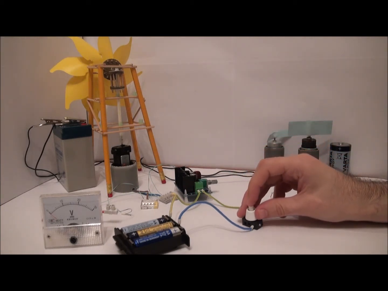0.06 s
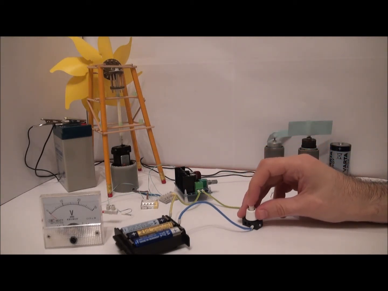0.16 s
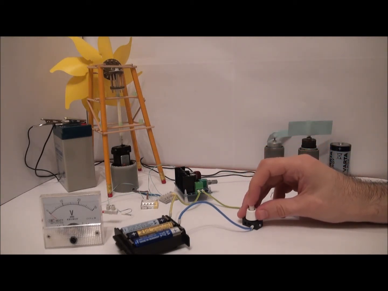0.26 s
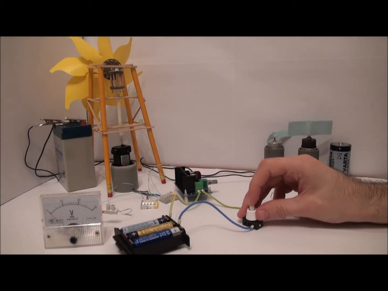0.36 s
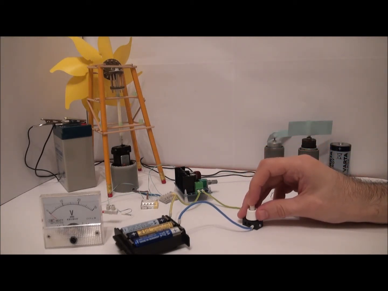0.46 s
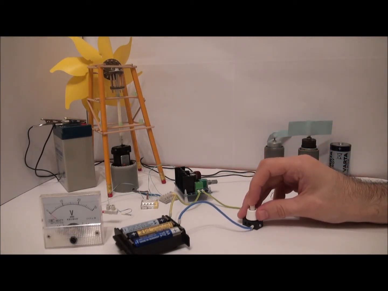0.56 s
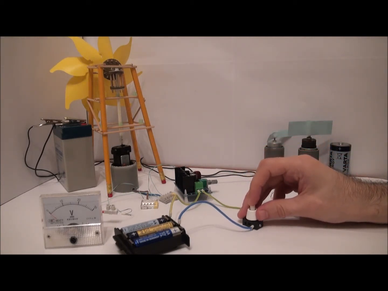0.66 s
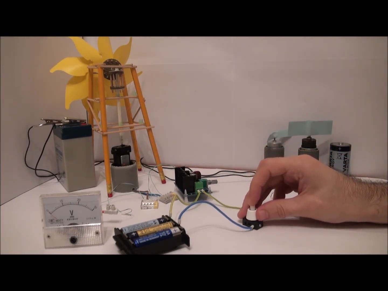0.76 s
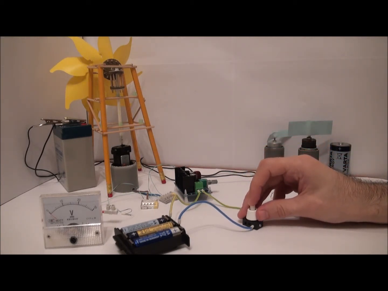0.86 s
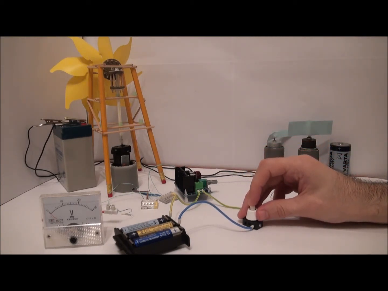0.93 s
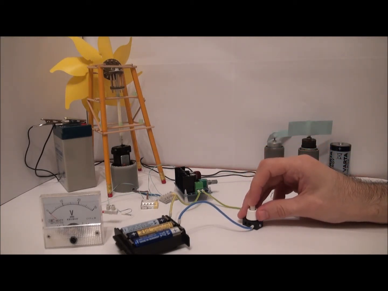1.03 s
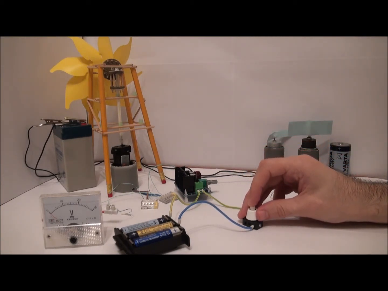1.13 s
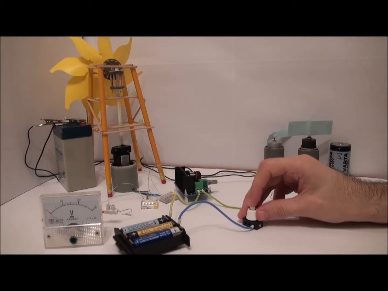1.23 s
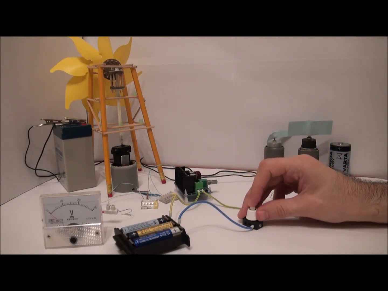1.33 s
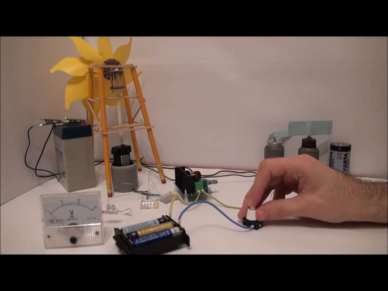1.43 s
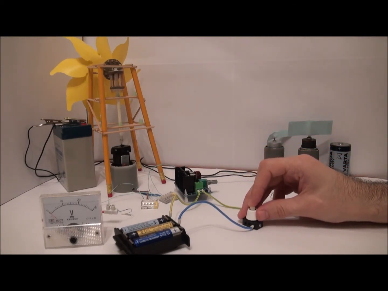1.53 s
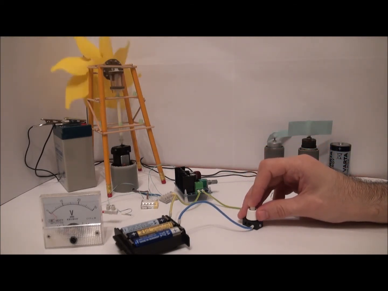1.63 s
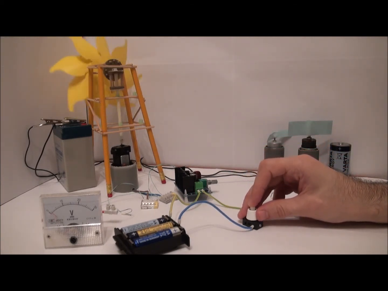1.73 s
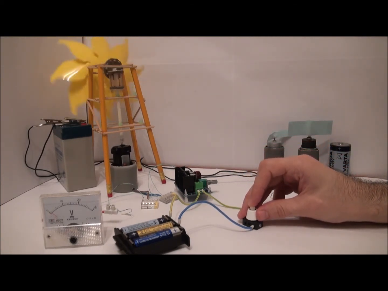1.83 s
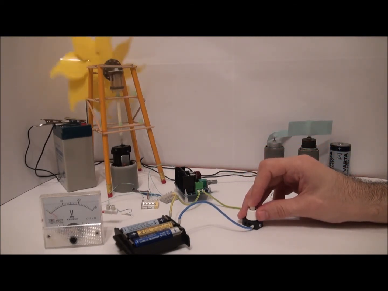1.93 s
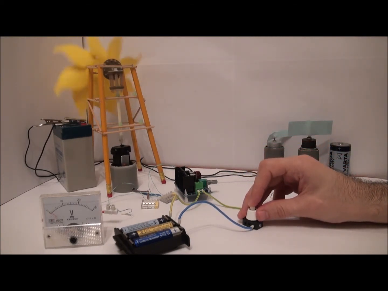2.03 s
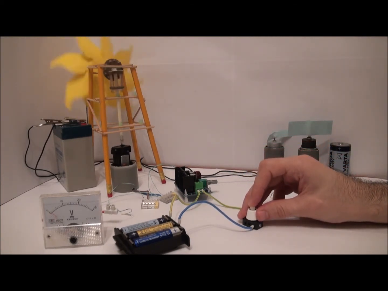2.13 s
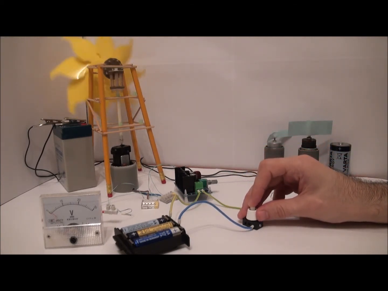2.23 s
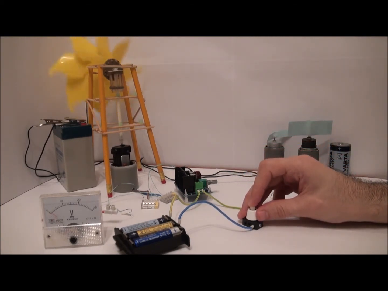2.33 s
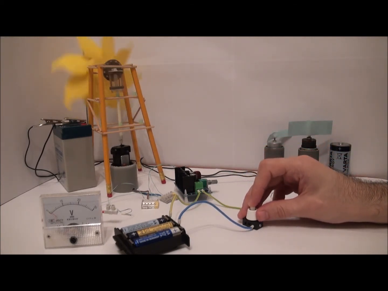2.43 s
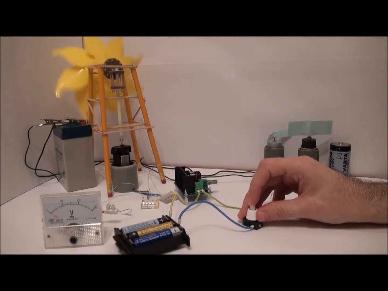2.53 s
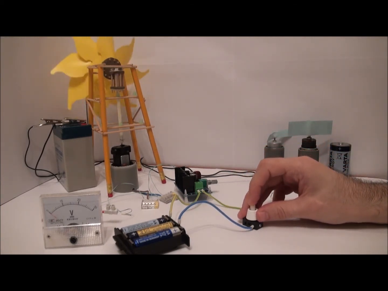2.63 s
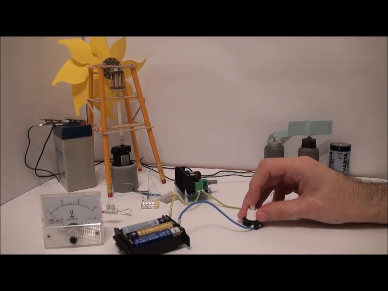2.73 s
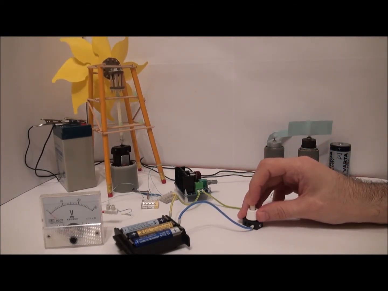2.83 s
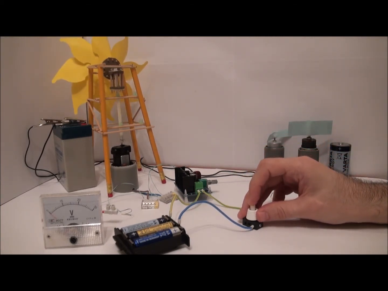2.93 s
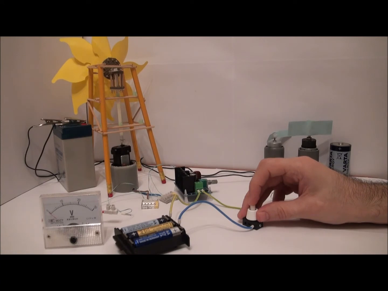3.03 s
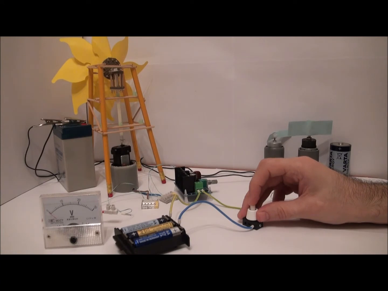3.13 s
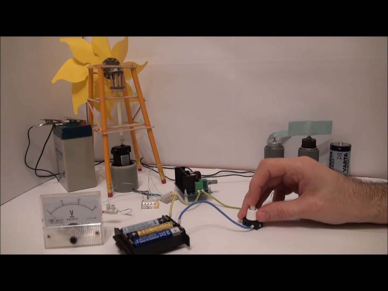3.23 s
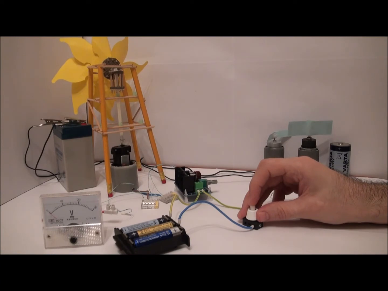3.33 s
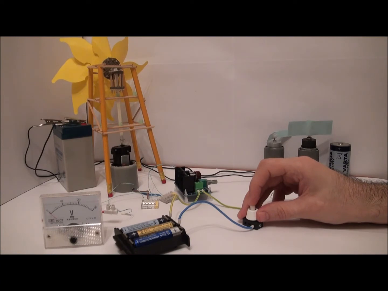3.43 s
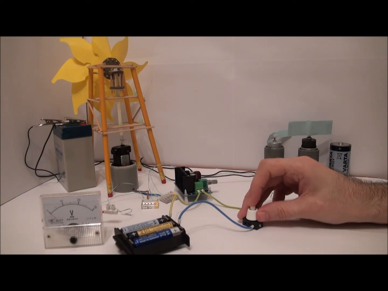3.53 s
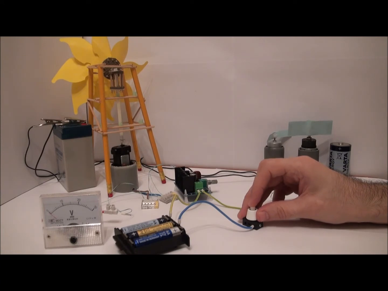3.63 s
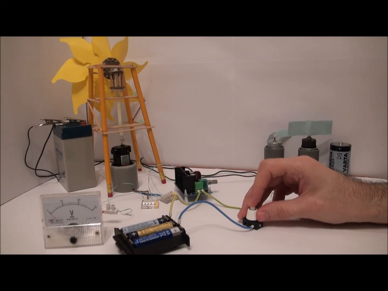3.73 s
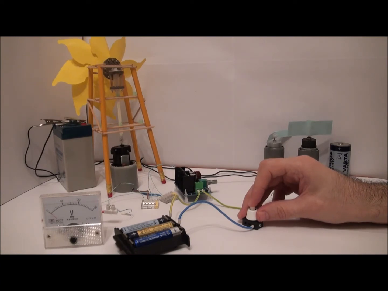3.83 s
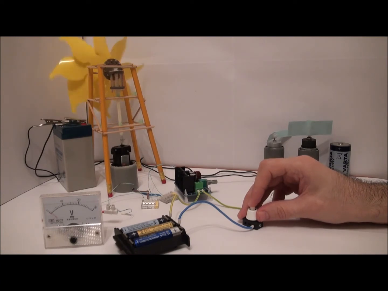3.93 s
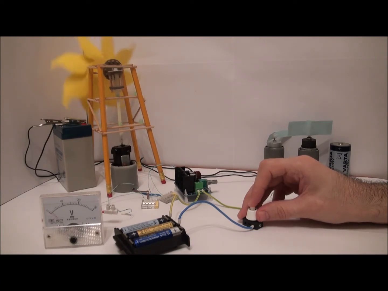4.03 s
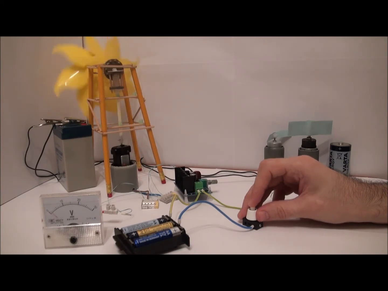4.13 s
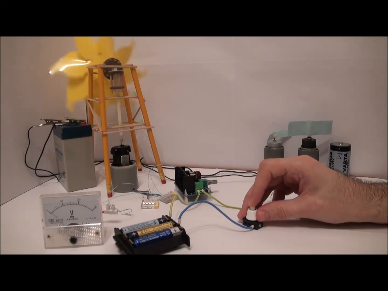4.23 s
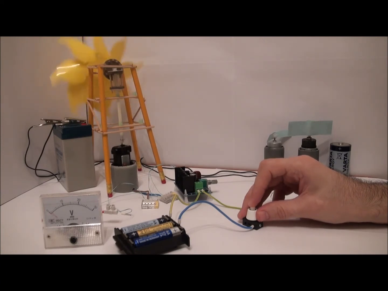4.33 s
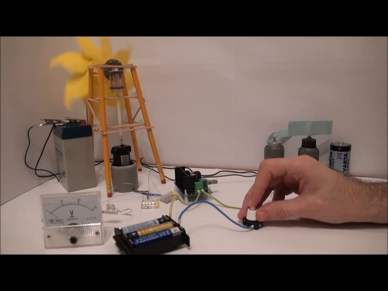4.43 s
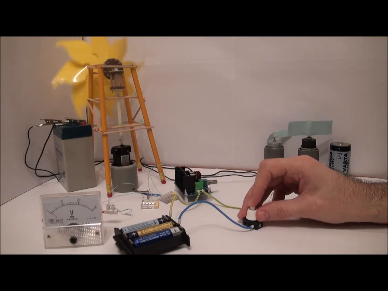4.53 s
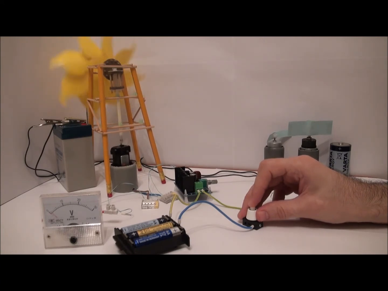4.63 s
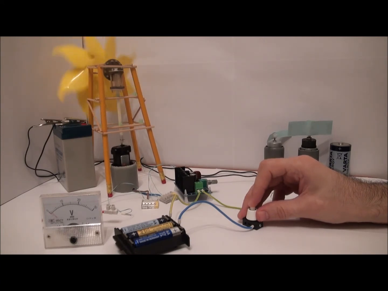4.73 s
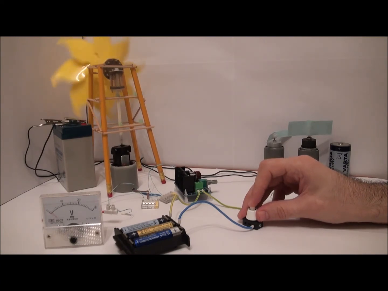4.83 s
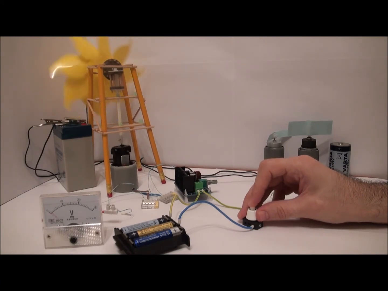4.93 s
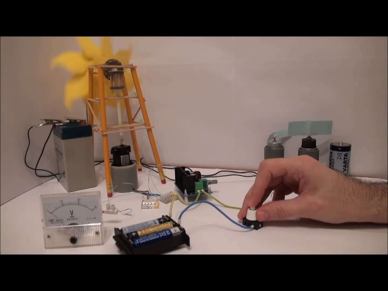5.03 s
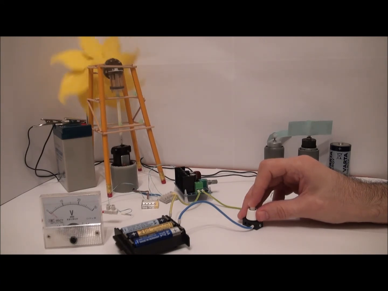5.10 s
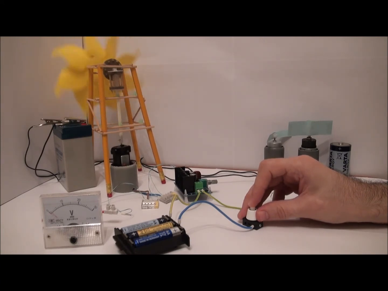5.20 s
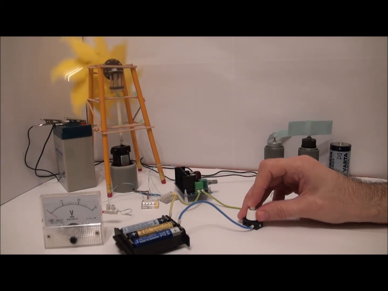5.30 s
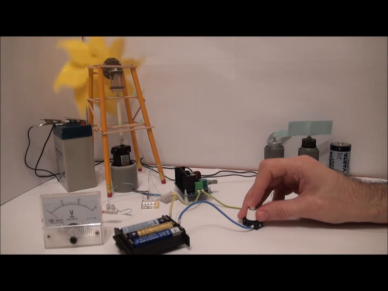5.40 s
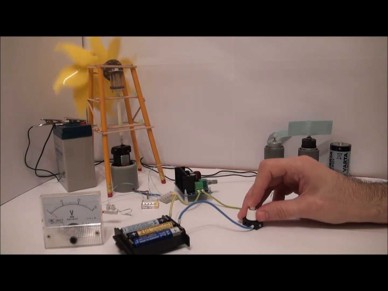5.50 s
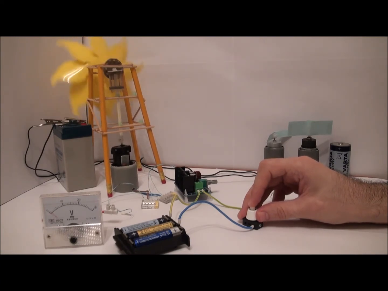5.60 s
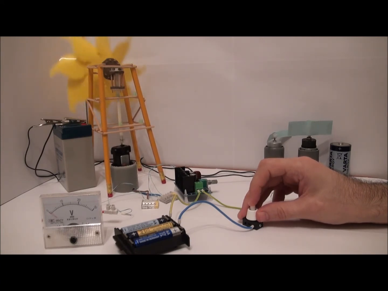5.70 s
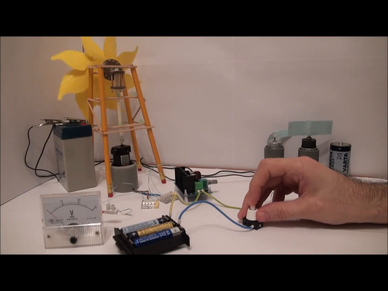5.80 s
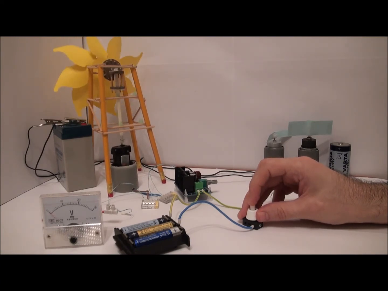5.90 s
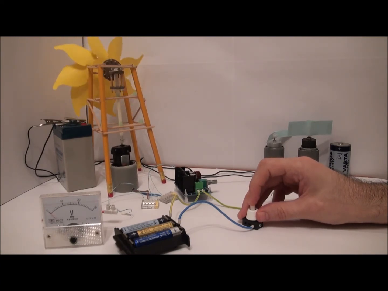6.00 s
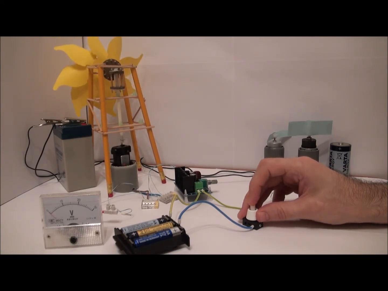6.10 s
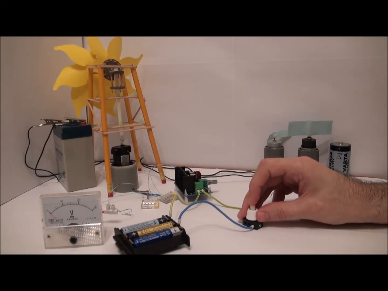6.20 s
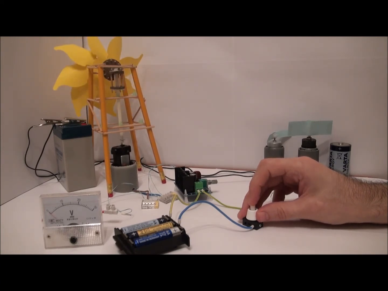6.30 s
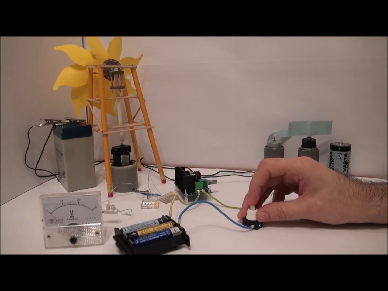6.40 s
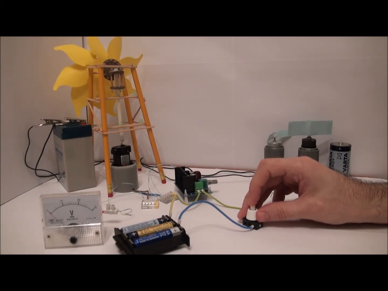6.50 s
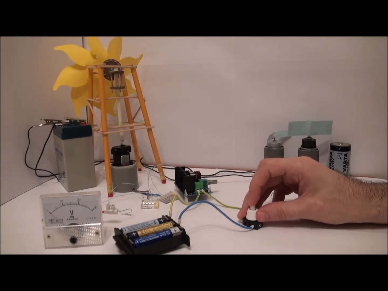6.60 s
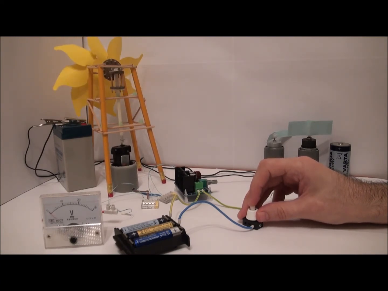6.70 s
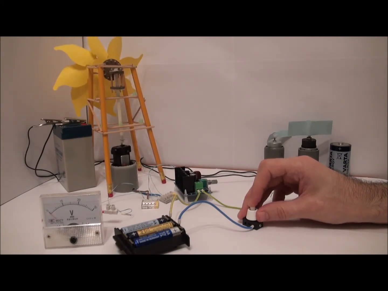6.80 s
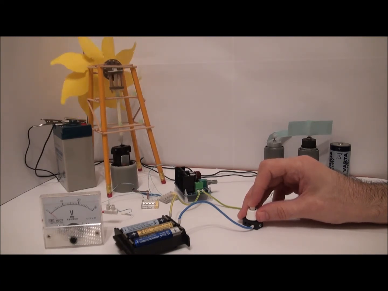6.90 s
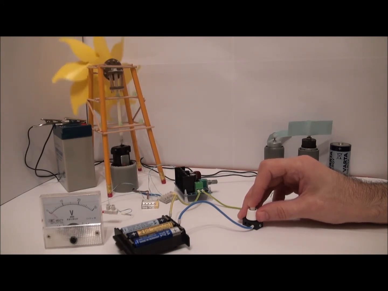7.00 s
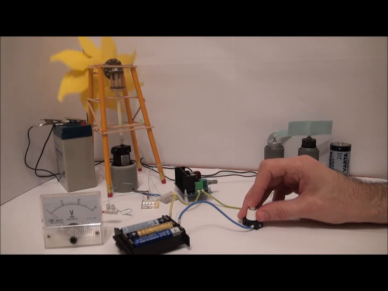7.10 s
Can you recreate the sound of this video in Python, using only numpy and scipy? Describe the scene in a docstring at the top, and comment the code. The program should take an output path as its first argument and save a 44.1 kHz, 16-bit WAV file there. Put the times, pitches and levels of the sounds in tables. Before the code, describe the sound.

A toy windmill's small motor runs three times on a tabletop, heard from nearby in a small room. Each run is a raspy, uneven rattle of loose plastic gears with sharp snaps, hollow clacks and a low hum through the table. The first run is short, the second longer, and the third has only just begun at the end. Soft finger thumps precede the first two, and a faint whine and hiss fill the gaps.

```python
"""On a tabletop in a small room, a little motor turns a toy windmill in three short runs.
Its loose plastic gears chatter: each touch of two teeth is a tiny scrape that rings the light frame,
and harder slams also snap and clack against the hollow housing. The motor and the slams shake the
table, a finger nudging the knob thumps it, and the room gives a short echo.
Between runs, a faint steady whine and hiss can be heard."""
import sys
import numpy as np
from scipy import signal
from scipy.fft import rfft, irfft
from scipy.io import wavfile
from scipy.ndimage import uniform_filter1d

SR = 44100
rng = np.random.default_rng(int(sys.argv[2]) if len(sys.argv) > 2 else 0)


def pcm_store(signal):
    """Save signal as 16-bit PCM."""
    levels = np.round(np.clip(np.atleast_2d(signal), -1, 1) * 32767)
    wavfile.write(sys.argv[1], SR, levels.astype(np.int16).T)


N = 315315

# Tone of the background hiss: pitch_hz, gain_db
HISS_TONE = [(15, -69), (25, -3), (96, -16), (144, -6.5), (341, -3), (447, -5.5), (688, -6), (830, -8),
             (1810, -12.5), (1970, -12), (2190, -14), (3280, -13.5), (3860, -18.5), (12600, -20.5),
             (15700, -22)]
# Broad hums in the hiss: pitch_hz, width_hz, gain_db
HISS_HUMS = [(113, 12, 8), (229, 14, 10), (4280, 120, 5), (12300, 1800, -5)]
# Pure tones of the whine, before they waver and swell: pitch_hz, level_db
WHINE_TONES = [(97, -69.5), (296, -72.5), (344.5, -66.5), (394, -73), (443, -80), (492, -74.5),
               (639.5, -71.5), (689, -69), (1190, -76), (1260.7, -75.5), (1918.8, -73), (1968, -77.5),
               (2690, -80), (3198, -66.5), (5292, -81), (9889, -82)]
# Slow swell of the background: time_s, gain_db
BACKGROUND_SWELL = [(0, -4.5), (.3, -5), (1.4, -3), (2.8, 1.5), (3.5, -0.5), (6, 1), (7.15, -1)]
# Tone of the stereo side signal (more gain sounds wider): pitch_hz, gain_db
STEREO_WIDTH = [(60, -35), (250, -24), (600, -15.5), (1500, -16.5), (8000, -14), (10500, -13), (12000, -30),
                (15000, -38)]
# Notes the table top rings at: pitch_hz, width_hz, gain_db
TABLE_MODES = [(75.6, 28, -3.5), (101.7, 17, 6.5), (137.6, 38.4, 5), (228.5, 14, 7.5), (321.6, 34.5, 6),
               (404, 29.5, 6), (677, 340, -1)]
# A finger nudges the knob and thumps the table: start_s, peak_db
FINGER_NUDGES = [(0.948, -46), (1.15, -49), (1.504, -47), (3.67, -40.5)]
# Tone of the teeth's rasp: pitch_hz, gain_db
RASP_TONE = [(290, -34), (500, -6.5), (1190, -8), (1580, -2.5), (1990, -4.5), (2580, 0.5), (3210, -2),
             (5960, -1.5), (11700, -10.5), (15700, -29.5)]
# Notes the light frame rings at: pitch_hz, width_hz, gain_db
FRAME_MODES = [(1680, 250, -2), (2620, 81, -10.5), (3960, 330, -2.5), (4800, 220, -3), (6120, 1440, -2),
               (7490, 800, -1), (8450, 170, 2.5), (11720, 380, -7)]
# Notes the hollow gear housing rings at: pitch_hz, width_hz, gain_db
HOUSING_MODES = [(1314, 380, -1.5), (1656, 440, 2.5)]
# Motor runs: on_s, spin_up_s, sluggish_db, off_s, coast_db_per_s, chatter_gain_db, rumble_gain_db
MOTOR_RUNS = [(1.51, 0.029, -6, 2.49, 133, -30.5, -41.5), (3.805, 0.04, -.5, 5.685, 172, -29.5, -41.5),
              (6.856, 0.023, -2, 7.3, 150, -30, -42.5)]
# The hardest tooth slams: start_s, scrape_gain_db, snap_gain_db, clack_gain_db
HARD_SLAMS = [(1.5172, -30, -41, -52), (1.526, -21, -41, -38), (1.5568, -19, -41, -33),
              (1.5963, -12, -23, -22.5), (1.6714, -19, -25.5, -24), (1.8094, -11.5, -26, -37),
              (1.8413, -13.5, -21, -17.5), (1.8553, -15, -27, -15.5), (1.8772, -7.5, -21, -25),
              (1.951, -11, -18, -16.5), (2.0635, -13, -41, -38), (2.1086, -19, -26, -38),
              (2.218, -20, -39, -38), (2.2341, -10.5, -21, -18), (2.263, -14, -40, -37),
              (2.284, -15, -31, -29), (2.3666, -11, -32, -31), (2.3773, -11, -28, -23),
              (2.4354, -13.5, -29, -26), (2.4904, -13, -42, -26), (2.6484, -27, -41, -45),
              (2.675, -18, -39, -28), (3.8118, -29.5, -53, -45), (3.831, -27, -49, -32),
              (3.8467, -20, -41, -37), (3.8775, -14.5, -27, -37), (3.892, -22, -36, -23),
              (3.907, -11.5, -23, -19), (3.9497, -12, -27, -22), (3.9772, -11.5, -20.5, -20.5),
              (4.0105, -22, -36, -18.5), (4.048, -9, -17.5, -23), (4.09, -17, -31, -20),
              (4.1877, -11.5, -22, -34), (4.2216, -12, -32, -38), (4.228, -20.5, -35, -17.5),
              (4.4085, -11, -38, -25), (4.4877, -17, -25, -35), (4.5075, -16, -30, -20),
              (4.597, -16, -24, -31), (4.6095, -8, -29, -11), (4.6294, -17, -32, -25),
              (4.6474, -16, -26, -33), (4.6666, -12, -30, -41), (4.7565, -12, -29, -31),
              (4.782, -32, -39, -21), (4.8675, -13.5, -27, -29), (4.8733, -20, -27, -18.5),
              (4.9494, -20, -28, -40), (5.008, -16, -26, -20), (5.0234, -19, -24.5, -24),
              (5.1208, -11, -40, -32), (5.147, -12.5, -26, -13.5), (5.1554, -15, -37, -30),
              (5.1901, -13, -27, -24), (5.306, -13, -29, -28), (5.313, -19, -37, -13),
              (5.3303, -24, -38, -29), (5.4053, -11, -28, -42), (5.533, -11, -32, -41),
              (5.6467, -9, -24, -27), (5.6698, -17, -27, -22), (5.6756, -19, -36, -38),
              (5.7928, -20.5, -35, -42), (6.8542, -27, -64, -39), (6.8992, -15, -41, -27),
              (6.9285, -15.5, -25, -20.5), (6.9648, -11, -19, -17), (7.011, -13.5, -32, -26),
              (7.062, -12, -32, -35), (7.1034, -13.5, -32, -37), (7.131, -15, -24, -14.5)]

ROOM_DECAY_S, ROOM_GAIN_DB = 0.3, -1.5
THUD_GAIN_DB, THUD_S = -15.5, 0.0011  # a gear blow pushing the table
SPEED_POWER, SLUGGISH_S, SAG_DB_PER_S = 2.5, 0.38, 1
TICKS_PER_S, TICK_SCATTER_DB, TICK_CAP_DB, TICK_S = 150, 5, 5, 0.0028
SMALL_SLAMS_PER_S, SLAM_SCATTER_DB = 30, 3
SNAP_ABOVE_HZ, TREBLE_LIMIT_HZ = 8600, 15660
CLACK_DELAY_S = 0.001306  # the shaft reaches the housing just after the teeth meet


def undb(db):
    """Turn decibels into a gain to multiply by."""
    return 10 ** (np.asarray(db) / 20)


def level(x, db):
    """Set a sound's average (rms) level."""
    return x * undb(db) / np.sqrt(np.mean(x ** 2))


def convolve(x, response):
    """Let every sample of x set off a copy of the response."""
    return signal.fftconvolve(x, response)[:N]


def colour(x, points):
    """Shape a sound's tone along a curve of (pitch_hz, gain_db) points."""
    hz, db = np.transpose(points)
    size = 4096
    grid_hz = np.arange(size // 2 + 1) * SR / size + 1
    log_gain = np.interp(np.log(grid_hz), np.log(hz), db) * np.log(10) / 20
    # Folding the cepstrum keeps the filter from sounding before it is struck.
    cepstrum = irfft(log_gain)
    cepstrum[1:size // 2] *= 2
    cepstrum[size // 2 + 1:] = 0
    return convolve(x, irfft(np.exp(rfft(cepstrum))))


def ring(x, modes, sign=-1):
    """Ring an object's notes (its modes); sign=-1 flips every second one, sign=1 flips none."""
    return sum(sign ** k * undb(db) * signal.lfilter(*signal.iirpeak(hz, hz / width, SR), x)
               for k, (hz, width, db) in enumerate(modes))


def wander(rate_hz):
    """A smooth random drift around zero."""
    hold = int(SR / rate_hz)
    steps = np.repeat(rng.standard_normal(N // hold + 1), hold)
    return uniform_filter1d(uniform_filter1d(steps, hold), hold)[:N]


def hits(times_s, gains):
    """Sharp pushes, each one sample long."""
    pushes = np.zeros(N)
    np.add.at(pushes, np.clip((np.asarray(times_s) * SR).astype(int), 0, N - 1), gains)
    return pushes


def scrapes(times_s, gains, length_s, rise_s=0.00093):
    """A scrape of noise that swells quickly and dies away after each contact."""
    t = np.arange(SR // 20) / SR
    shape = np.clip(t / rise_s, 0, 1) * np.exp(-(t / length_s) ** 1.42)
    return np.maximum(convolve(hits(times_s, gains), shape), 0) * rng.standard_normal(N)


def keep_power(body, x):
    """Pass x through a filter, scaled so that white noise would keep its level."""
    return body(x) / np.sqrt(np.sum(body(hits([0], [1])) ** 2))


def keep_peak(body, x):
    """Pass x through a filter, scaled so that a push of 1 would peak at 1."""
    return body(x) / np.max(np.abs(body(hits([0], [1]))))


def whine_and_hiss():
    """Hiss, hums and a whine whose low tones waver most. Returns the middle and side sounds."""
    t = np.arange(N) / SR
    whine = 0
    for hz, db in WHINE_TONES:
        waver_db = min(3., 1 + 700 / hz) * wander(18)
        whine += np.sqrt(2) * undb(db + waver_db) * np.sin(2 * np.pi * (hz * t + rng.random()))
    hiss, side_hiss = [level(colour(rng.standard_normal(N), HISS_TONE), -56.5) for _ in range(2)]
    hums = ring(hiss, HISS_HUMS, sign=1)
    swell = undb(np.interp(t, *np.transpose(BACKGROUND_SWELL)))
    return swell * (hiss + hums + whine), swell * side_hiss


def room_echo(x):
    """The room answers with a short blur of echoes whose treble dies first."""
    t = np.arange(SR // 2) / SR
    bright = rng.standard_normal(len(t)) * undb(-60 * t / ROOM_DECAY_S) * np.clip(t / 0.004, 0, 1)
    dull = signal.lfilter([.45], [1, -.55], bright)
    tail = bright * np.exp(-t / 0.09) + dull * (1 - np.exp(-t / 0.042))
    return convolve(x, tail / np.sqrt(np.sum(tail ** 2)))


def table_thump(blows, contact_s):
    """A soft contact spreads each blow in time, so it rings the table's lower notes."""
    soft_push = np.hanning(int(contact_s * SR))
    return keep_peak(lambda x: ring(convolve(x, soft_push), TABLE_MODES), blows)


def finger_nudges():
    """A finger on the knob thumps the table and makes a brief scuff."""
    start_s, peak_db = np.transpose(FINGER_NUDGES)
    thump = table_thump(hits(start_s, undb(peak_db)), contact_s=0.0033)
    rub = scrapes(start_s, undb(peak_db - 5), length_s=0.028)
    scuff = ring(ring(rub, [(1500, 1800, 0)]), [(1410, 1900, 4.5)])
    return thump + scuff


def table_rumble(rumble, blows):
    """The table top hums along with the motor and thuds at each gear blow."""
    waver = undb(1.5 * wander(10))
    hum = level(ring(rng.standard_normal(N), TABLE_MODES), 0)
    return rumble * waver * hum + undb(THUD_GAIN_DB) * table_thump(blows, THUD_S)


def motor():
    """The motor spins up, runs and coasts down. Returns gains for the gears and the table's rumble."""
    t = np.arange(N) / SR
    drive = rumble = 0
    for on_s, spin_up_s, sluggish_db, off_s, coast_db_per_s, chatter_db, rumble_db in MOTOR_RUNS:
        running_s = np.maximum(t - on_s, 0)
        speed = 1 - np.exp(-running_s / spin_up_s)
        slow_start_db = sluggish_db * np.exp(-(running_s / SLUGGISH_S) ** 2)
        coast_db = coast_db_per_s * np.maximum(t - off_s, 0)
        strength = speed ** SPEED_POWER * undb(slow_start_db - SAG_DB_PER_S * running_s - coast_db)
        drive += undb(chatter_db) * strength
        # The rumble fades more slowly than the chatter, then stops.
        rumble += undb(rumble_db) * np.maximum(strength ** 0.37 - 0.08, 0)
    return drive, rumble


def frame(x):
    """The light frame passes on a broad rasp and adds its own notes."""
    rasp = colour(x, RASP_TONE)
    return rasp + ring(rasp, FRAME_MODES, sign=1)


def housing(x):
    """The hollow gear housing clacks when pushed."""
    return ring(x, HOUSING_MODES)


def tooth_snap(x):
    """The edge of a tooth gives only a bright snap."""
    treble_only = signal.butter(3, SNAP_ABOVE_HZ, "high", fs=SR, output="sos")
    return colour(signal.sosfilt(treble_only, x), RASP_TONE)


def gear_chatter(drive):
    """One gear pair: many small, uneven tooth contacts rasp the frame; some ring the housing."""
    count = int(TICKS_PER_S * N / SR)
    when, size, chance = rng.random((count, 3)).T
    times_s = when * N / SR
    gains = undb(np.minimum(-TICK_SCATTER_DB * np.log(size + 1e-9), TICK_CAP_DB))
    ticks = level(frame(drive * scrapes(times_s, gains, TICK_S)), -42)
    clacks = level(housing(drive * hits(times_s, gains * (chance < .15))), -58)
    return undb(2 * wander(12)) * (ticks + clacks)


def small_slams(drive):
    """Random extra rows like HARD_SLAMS, as strong as the gears run at that moment."""
    count = int(SMALL_SLAMS_PER_S * N / SR)
    late, scrape_luck, snap_luck, clack_luck = rng.standard_normal((count, 4)).T
    start_s = np.clip((np.arange(count) + .4 * late) / count, 0, 1) * (N - 1) / SR
    drive_db = 20 * np.log10(drive[(start_s * SR).astype(int)] + 1e-9)
    scrape_db = drive_db + 11.5 + SLAM_SCATTER_DB * scrape_luck
    snap_db = scrape_db - 16 + SLAM_SCATTER_DB * snap_luck
    clack_db = scrape_db - 16.5 + SLAM_SCATTER_DB * clack_luck
    return np.transpose([start_s, scrape_db, snap_db, clack_db])


def gear_slams(drive):
    """Loose teeth slam, bounce once, snap and clack the housing. Returns the sound and the blows."""
    start_s, scrape_db, snap_db, clack_db = np.vstack([HARD_SLAMS, small_slams(drive)]).T
    size = undb(scrape_db - 5.5)  # leaves room for the peaks of the noise
    strike = scrapes(start_s, size, length_s=0.002)
    bounce = scrapes(start_s + 0.00464, 0.16 * size, length_s=0.0014)
    edge = scrapes(start_s, undb(snap_db), length_s=0.0026)
    clack_s, clack_gain = start_s + CLACK_DELAY_S, undb(clack_db)
    blows = hits(clack_s, 0.62 * clack_gain) + hits(clack_s + 0.00078, 0.25 * clack_gain)
    sound = keep_power(frame, strike + bounce) + keep_power(tooth_snap, edge) + keep_peak(housing, blows)
    return sound, blows


def scene():
    """Mix the toy, table, room and background into left and right."""
    drive, rumble = motor()
    slams, blows = gear_slams(drive)
    parts = [gear_chatter(drive) for _ in range(3)] + [slams]
    toy = sum(parts)
    table = table_rumble(rumble, blows) + finger_nudges()
    background, side_hiss = whine_and_hiss()
    # Each gear pair sits in its own spot, so each gets its own echo.
    echoes = undb(ROOM_GAIN_DB) * sum(room_echo(part) for part in parts)
    middle = toy + echoes + table + background
    # The side sound is added on the left and taken away on the right, which gives width.
    side = colour(room_echo(toy + table) + 0.34 * toy + undb(13) * side_hiss, STEREO_WIDTH)
    return np.array([middle + side, middle - side])


def record(dry):
    """Round off the loudest peaks and steeply cut the highest treble."""
    rounded = np.tanh(2.49 * dry) / 2.5
    return signal.sosfilt(signal.ellip(12, .2, 95, TREBLE_LIMIT_HZ, fs=SR, output="sos"), rounded)


dry = scene()
out = record(dry)
pcm_store(out)
```